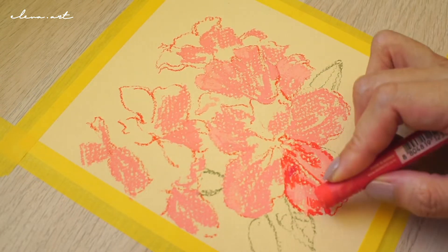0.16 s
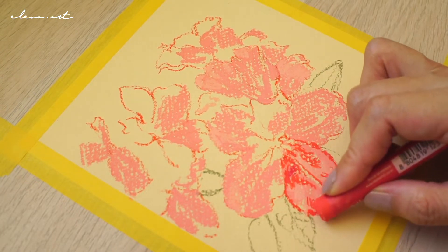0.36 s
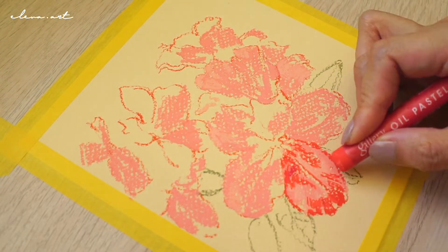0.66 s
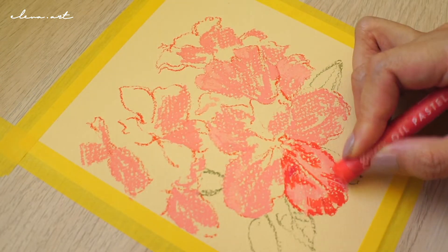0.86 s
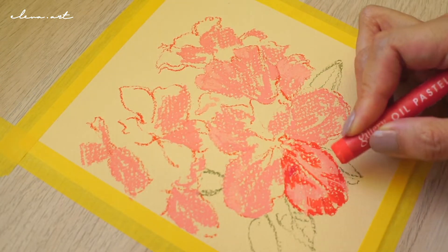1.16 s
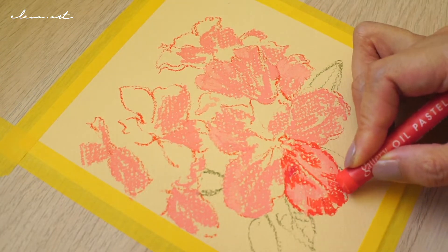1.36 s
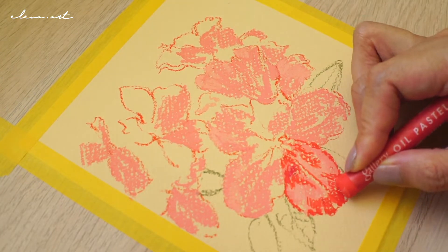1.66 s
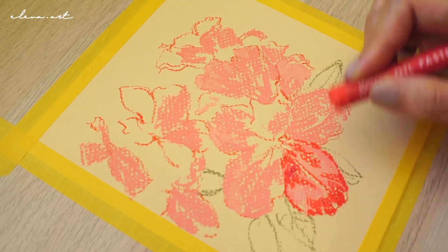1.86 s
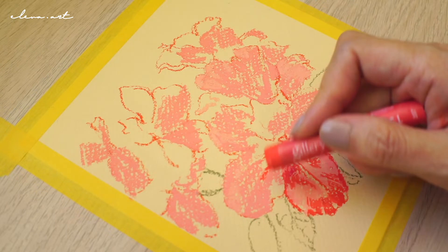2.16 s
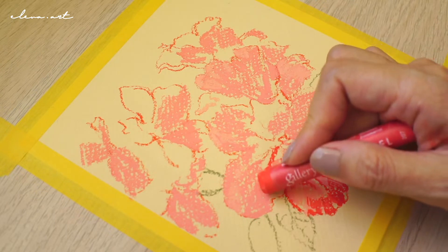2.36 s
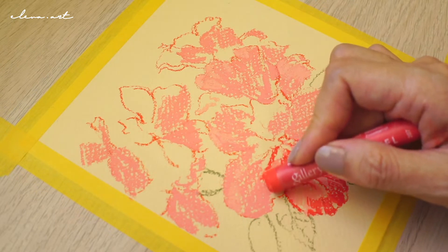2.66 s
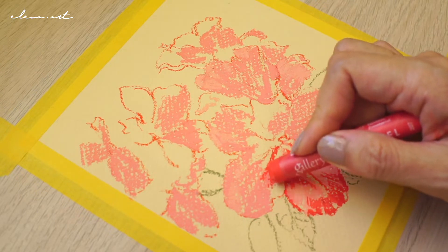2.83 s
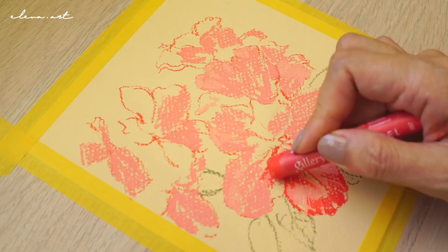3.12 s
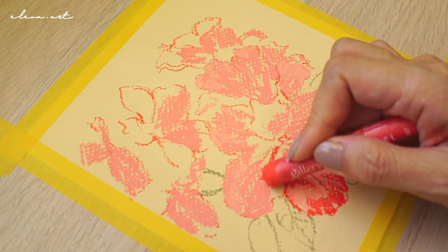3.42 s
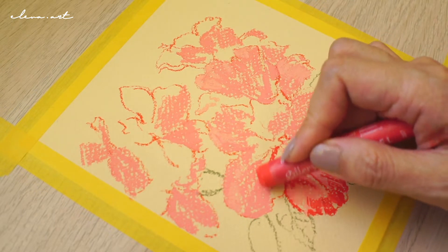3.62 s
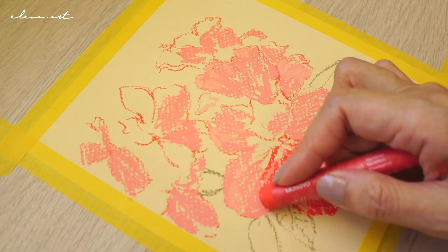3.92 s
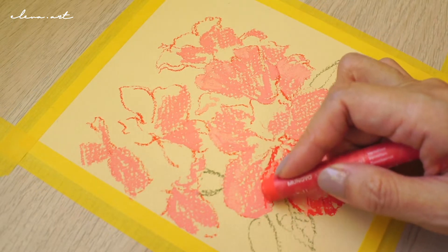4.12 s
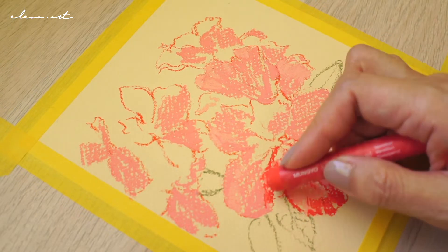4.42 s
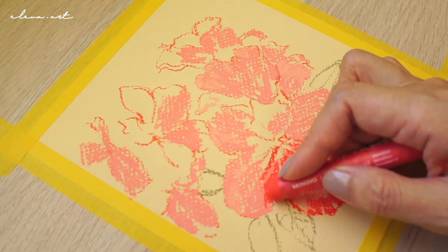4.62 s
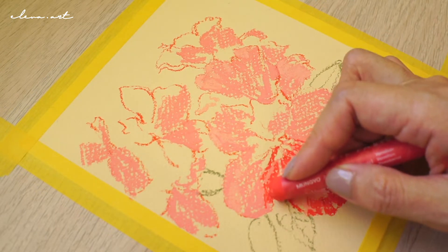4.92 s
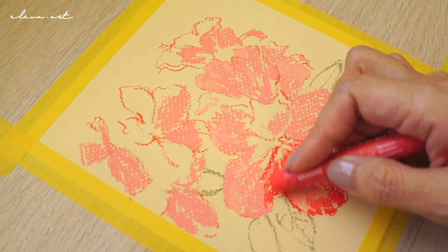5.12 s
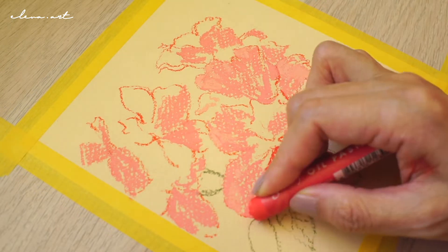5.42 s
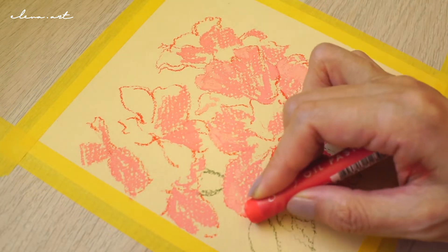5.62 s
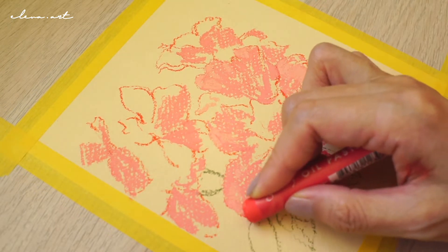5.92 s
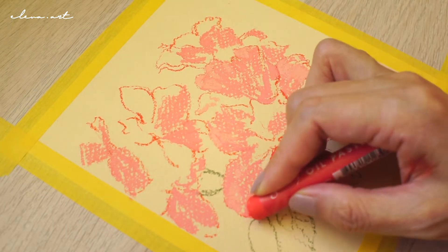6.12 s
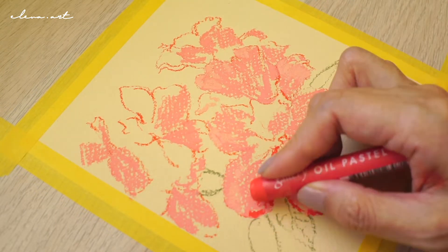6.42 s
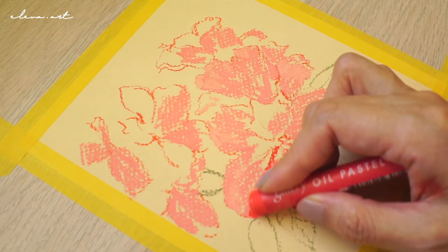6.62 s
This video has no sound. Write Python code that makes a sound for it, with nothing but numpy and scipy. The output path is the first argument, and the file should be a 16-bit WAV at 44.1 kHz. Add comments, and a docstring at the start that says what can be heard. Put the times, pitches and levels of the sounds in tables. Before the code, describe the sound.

A waxy pastel stick dabs paper on a wooden table, heard close in a small room over steady hiss. Two firm soft knocks come first, then small dry scratches and faint touches with gaps. Later, quick runs of about ten dull taps a second come and go, thinning into separate, uneven dabs at the end.

```python
"""Throughout, a steady wide hiss of room and microphone: coloured noise with partly alike channels.
From 0.2 s an oil pastel is dabbed onto paper taped to a wooden table: a soft push rings the table's modes.
Two dabs come close together, then sparse ones, then from 2.6 s quick runs of about ten a second.
Between 0.8 and 3.9 s the tip also makes seven dry scratches on the paper: bursts of crackling noise.
A small room answers each dab and scratch with a diffuse tail; the last dabs come just before 6.8 s."""
import sys
import numpy as np
from scipy import signal
from scipy.fft import rfft, irfft, next_fast_len
from scipy.io import wavfile
from scipy.ndimage import uniform_filter1d

SR = 44100
rng = np.random.default_rng(int(sys.argv[2]) if len(sys.argv) > 2 else 0)


def materialize(psi):
    """Save the field psi as 16-bit PCM at rate SR to the path in sys.argv[1].

    A 1-D psi becomes a single channel; in a 2-D psi each row is a channel.
    """
    bounded = np.clip(np.atleast_2d(psi).T, -1, 1)
    quanta = np.round(bounded * 32767).astype(np.int16)
    wavfile.write(sys.argv[1], SR, quanta)


N = 298998  # length in samples


def amp(db):
    """Decibel law: 20 dB is a tenfold amplitude ratio."""
    return 10 ** (np.asarray(db) / 20)


def unit(x):
    """Power normalisation: x scaled to rms 1."""
    return x / np.sqrt(np.mean(x ** 2) + 1e-20)


def along(points, hz):
    """Logarithmic frequency scale: (Hz, value) points interpolated over log frequency."""
    f, v = np.transpose(points)
    return np.interp(np.log(hz + 1), np.log(f + 1), v)


def filtered(x, response):
    """Linear filtering: the spectrum of x times a response that is a function of frequency."""
    n = x.shape[-1]
    m = next_fast_len(n + 8192)  # zero padding leaves space for the filter's ringing
    hz = np.fft.rfftfreq(m, 1 / SR)
    return irfft(rfft(x, m) * response(hz), m)[..., :n]


def add(track, s, sound):
    """Superposition: a stereo sound is summed into the track at time s."""
    start = max(round(s * SR), 0)
    part = track[:, start:][:, :sound.shape[1]]
    part += sound[:, :part.shape[1]]


# Spectrum of the background hiss: pitch_hz [Hz], level_db [relative dB per Hz]
HISS_SPECTRUM = [(30, -32), (80, -47), (125, -29), (200, -15.5), (310, -9), (500, 1), (800, 3), (1300, 2),
                 (2200, -2.5), (4000, -7.5), (8000, -13), (12500, -16), (15500, -19)]
# Correlation of left and right hiss: pitch_hz [Hz], likeness [-1 to 1]
HISS_LIKENESS = [(60, 0.21), (130, 1), (290, 0.14), (640, -0.3), (1410, -0.35), (3100, -0.025),
                 (6820, 0.11), (15000, 0.25)]


def hiss(level_db=-52.5):
    """Partial coherence: the mid-to-side ratio of stationary noise sets the likeness of its channels."""
    def mid_and_side(hz):
        # cos(angle)^2 - sin(angle)^2 equals the likeness
        angle = np.arccos(np.clip(along(HISS_LIKENESS, hz), -1, 1)) / 2
        return amp(along(HISS_SPECTRUM, hz)) * [np.cos(angle), np.sin(angle)]

    mid, side = filtered(rng.standard_normal((2, N)), mid_and_side)
    return amp(level_db) * unit(np.array([mid + side, mid - side]))


# Reverberation time of the room: pitch_hz [Hz], t60_s [s]
ROOM_DECAY = [(200, 0.48), (900, 0.3), (2500, 0.4), (10000, 0.6)]
# Spectrum of the reverberant tail: pitch_hz [Hz], level_db [dB]
ROOM_SPECTRUM = [(150, -16), (400, -12.5), (800, -3.5), (1300, -14.5), (2200, -4.5), (3500, -9.5),
                 (14000, -12)]


def in_room(sound, build_s=0.0058):
    """Diffuse reverberation: a noise tail builds up, then decays at a rate set by frequency."""
    hz, t, bands = signal.stft(rng.standard_normal((2, SR // 3)), SR, nperseg=256)
    decay = amp(-60 * t / along(ROOM_DECAY, hz)[:, None])
    fade = decay * (1 - np.exp(-(t / build_s) ** 2))
    fade = fade / np.linalg.norm(fade, axis=1, keepdims=True)  # equal energy in every band
    tail = signal.istft(bands * fade, SR, nperseg=256)[1]
    tail = tail / np.linalg.norm(tail[0])
    tail = filtered(tail, lambda f: amp(along(ROOM_SPECTRUM, f)))
    return sound + signal.fftconvolve(sound, tail, axes=1)[:, :sound.shape[1]]


# Spectrum of friction on the paper: pitch_hz [Hz], level_db [relative dB per Hz]
PAPER_SPECTRUM = [(100, -35), (300, -1.5), (900, 11), (2500, 5.5), (5000, -6.5), (9500, -3), (13000, -7.5),
                  (16000, -14)]
# Drags of the tip: start_s [s], level_db [dB rms before the stroke's fade], length_s [s before the
# release], tilt_db [dB per octave well above 2 kHz]
SCRATCH_STROKES = [(0.8215, -38.5, 0.016, 1.5), (1.06, -43.5, 0.018, -0.5), (1.338, -44.5, .002, -4),
                   (2.015, -56, 0.074, 1), (2.085, -64.5, .08, -6), (3.562, -38, 0.003, -7.5),
                   (3.834, -46.5, 0.043, -11)]


def scratches(rise_s=0.0004, release_s=0.0074, grit_db=3, grain_size=24, catch_db=12):
    """Stick-slip friction: the tip catches with a sharp tick, then crackles over fibres until it lifts."""
    track, t = np.zeros((2, N)), np.arange(SR // 3) / SR
    for s, db, length, tilt_db in SCRATCH_STROKES:
        grain = unit(uniform_filter1d(rng.standard_normal(len(t)), grain_size))  # size in samples
        fibres = amp(grit_db * grain)  # the grain varies the force in dB
        slips = unit(fibres * rng.standard_normal((2, len(t))))
        slips[:, 2 * grain_size] += amp(catch_db)  # the tick, about 1 ms in
        colour = lambda hz: amp(along(PAPER_SPECTRUM, hz) + tilt_db * np.log2(1 + hz / 2000))
        friction = unit(filtered(slips, colour))
        rise = 1 - np.exp(-t / rise_s)
        release = np.exp(-np.maximum(t - length, 0) / release_s)
        add(track, s, in_room(amp(db) * rise * release * friction))
    return track


# Modes of the table top: pitch_hz [Hz], level_db [dB], t60_s [s], pan_db [dB, left over right]
TABLE_MODES = [(221, -18.5, 0.034, 1), (406, -14.5, 0.011, 0.5), (639, -7, 0.022, -2), (825, 8, 0.1, 0.5),
               (892.5, 1.33, 0.012, 3), (1134, -3, 0.0082, 3.5), (1696, -6.5, 0.023, 7),
               (1890, -12.5, 0.019, -15), (2148, -15, 0.029, 18), (2417, -18.5, 0.012, -13.5),
               (2933, -20, 0.015, -2)]


def table_top(hz, spot_db=2.0, low_hz=175, tick_db=-50):
    """Modal superposition: damped resonances add up, weighted a little differently at each spot touched."""
    response = np.full((2, len(hz)), amp(tick_db), complex)  # the paper adds a faint tick
    for k, (centre, db, t60, pan_db) in enumerate(TABLE_MODES):
        width = np.log(1000) / (np.pi * t60)  # bandwidth in Hz
        damping = 1j * hz * width
        mode = (-1) ** k * damping / (centre ** 2 - hz ** 2 + damping)  # signs alternate
        side_db = np.array([[pan_db], [-pan_db]]) / 2
        response += amp(db + spot_db * rng.standard_normal() + side_db) * mode
    return response * hz ** 2 / np.sqrt(hz ** 4 + low_hz ** 4)  # the board radiates little bass


# The grip turns the tip from blunt face to edge: start_s [s], contact_s [s, for a medium dab; longer is duller]
TIP_CONTACT = [(.25, 0.00033), (1, 0.00061), (4.6, 0.00048), (5.1, 0.00029), (5.55, 0.00055),
               (5.73, 0.00023), (5.88, 0.00026), (6.1, .00058), (6.67, 0.0005), (6.78, 0.00022)]
MEDIUM_DB = -17  # level of a medium dab
STIFFENING = 0.36  # dB by which the contact shortens for each dB above medium


def contact_time(s, db):
    """Nonlinear contact stiffness: wax stiffens under load, so a harder push is shorter and brighter."""
    return np.interp(s, *np.transpose(TIP_CONTACT)) * amp(-STIFFENING * (db - MEDIUM_DB))


# Reflections from near surfaces: delay_s [s], left_gain [ratio], right_gain [ratio]
NEAR_SURFACES = [(.00296, 0.3, .3), (.00682, 0.13, 0.14), (0.0124, 0.07, 0.1), (.01787, 0.1, 0.13),
                 (.02242, .12, 0.12), (.02622, 0.076, .1)]
# Dabs of the tip: start_s [s], level_db [dB peak of the two channels' mean, before the room's tail]
DAB_STARTS = [(0.202, -21.5), (0.295, -14), (1.003, -47), (1.578, -41.5), (2.59, -42), (2.66, -26),
              (2.744, -21), (2.83, -16), (3.155, -27), (3.239, -22), (3.249, -25.5), (3.342, -18.5),
              (3.428, -19), (3.523, -22), (3.609, -20.5), (3.747, -32.5), (3.847, -28), (3.936, -28),
              (4.024, -27.5), (4.209, -41.5), (4.444, -41.5), (4.56, -28.5), (4.664, -44.5), (4.759, -21),
              (4.854, -24), (4.947, -14.5), (5.042, -19.5), (5.133, -22.5), (5.541, -32), (5.73, -22),
              (5.875, -18.5), (6.097, -34), (6.275, -28), (6.434, -27), (6.566, -38.5), (6.669, -28.5),
              (6.774, -27.5)]
ONSET_LAG_S = 0.002533  # fixed lag from each listed start to the centre of the push


def dabs(size=8192, lead_count=128, drag_db=-28, drag_s=0.0071, wax_hz=3600):
    """Impact excitation: a short soft push and a little drag ring the table; near surfaces repeat it."""
    track, hz, t = np.zeros((2, N)), np.fft.rfftfreq(size, 1 / SR), np.arange(size) / SR
    delay = lambda s: np.exp(-2j * np.pi * hz * s)
    echoes = 1 + sum(np.array([[left], [right]]) * delay(s) for s, left, right in NEAR_SURFACES)
    wax = 1 / np.sqrt(1 + (hz / wax_hz) ** 6)  # the soft tip passes little treble
    lead_s = lead_count / SR  # space for the part of the push before its centre
    for s, db in DAB_STARTS:
        push = np.exp(-(hz * contact_time(s, db)) ** 2)
        # the drag over the paper's tooth is a brighter, ragged force that dies after the push
        ragged = rng.standard_normal(size) * np.exp(-t / drag_s)
        drag = amp(drag_db) * rfft(ragged) * hz / (hz + wax_hz)
        force = (push + drag) * wax * delay(lead_s)
        knock = irfft(force * table_top(hz) * echoes)
        knock = amp(db) * knock / np.abs(knock.mean(0)).max()
        add(track, s + ONSET_LAG_S - lead_s, in_room(knock))
    return track


def scene():
    """Superposition: the hiss, the dabs and the scratches add linearly."""
    return hiss() + dabs() + scratches()


def record(dry, top_hz=15850):
    """Band limitation: the recorder keeps nothing from its top frequency upward."""
    return filtered(dry, lambda hz: hz < top_hz)


dry = scene()
out = record(dry)
materialize(out)
```